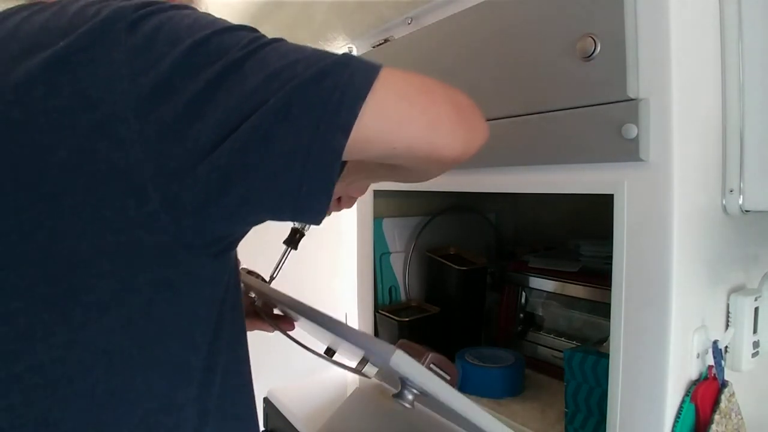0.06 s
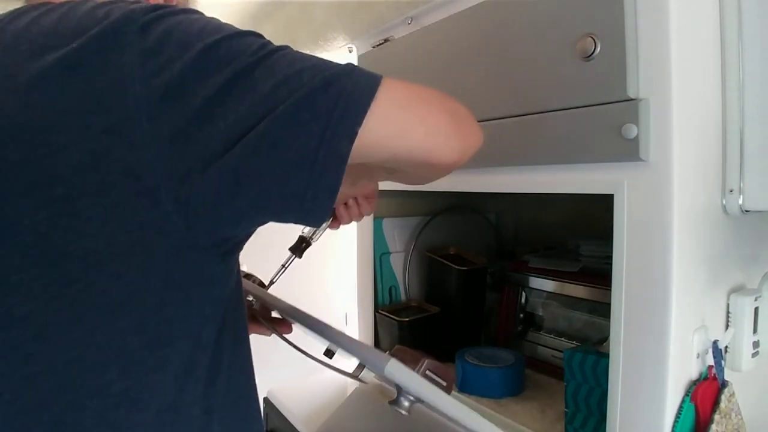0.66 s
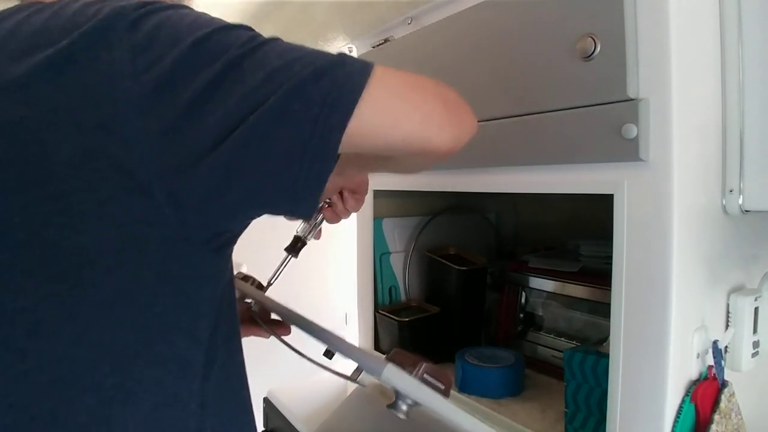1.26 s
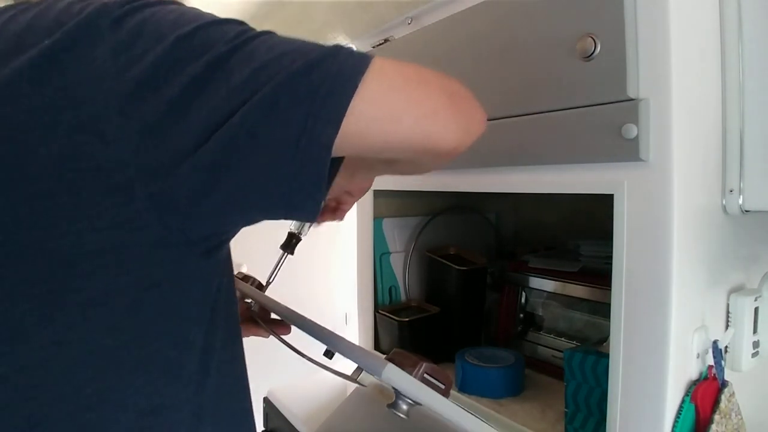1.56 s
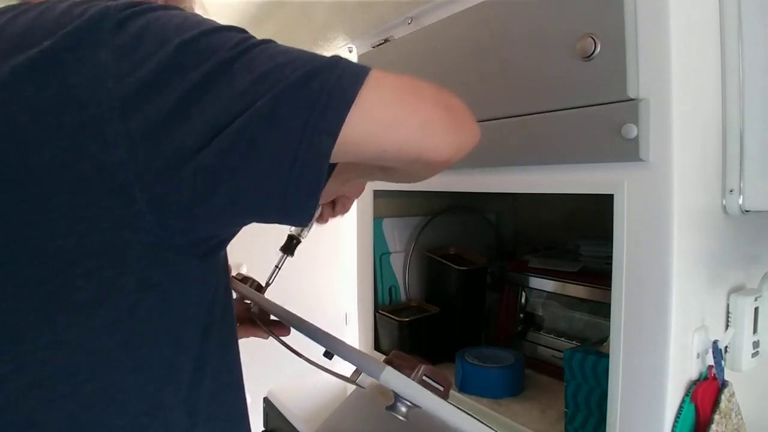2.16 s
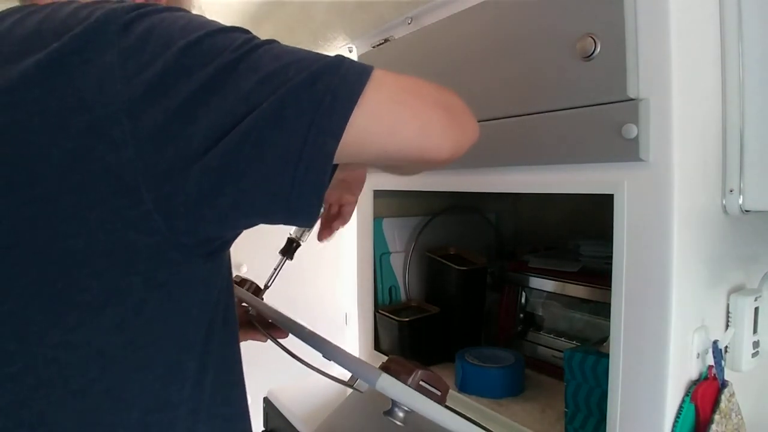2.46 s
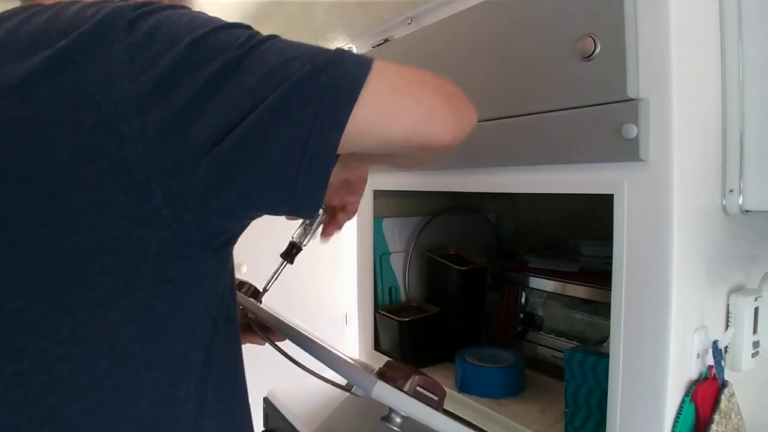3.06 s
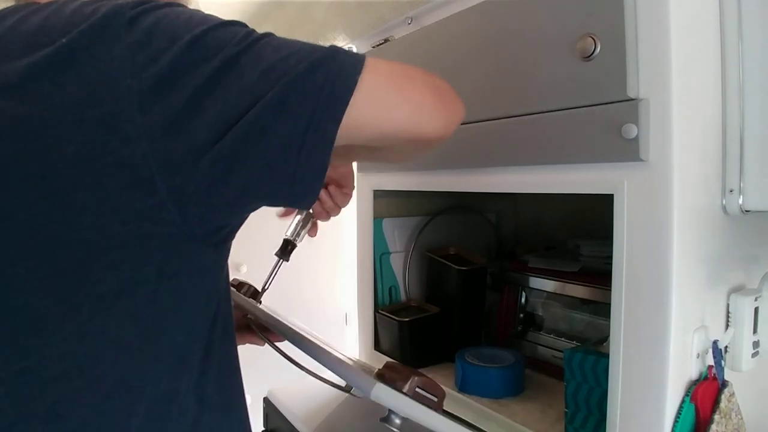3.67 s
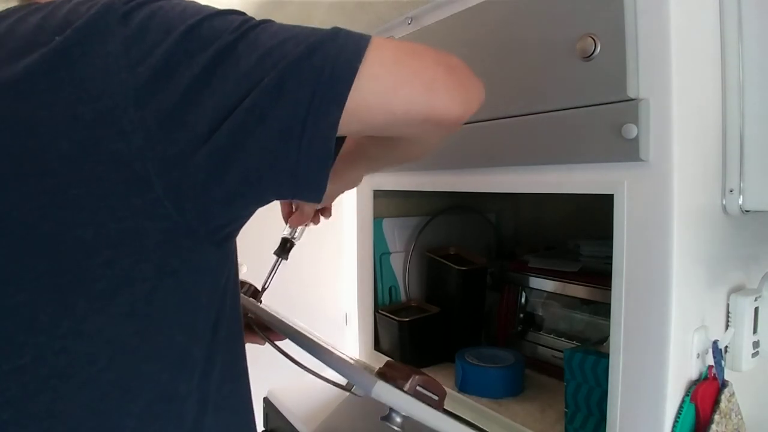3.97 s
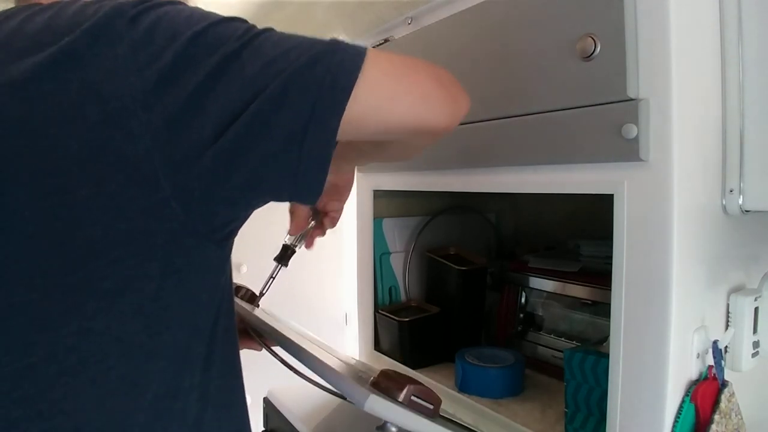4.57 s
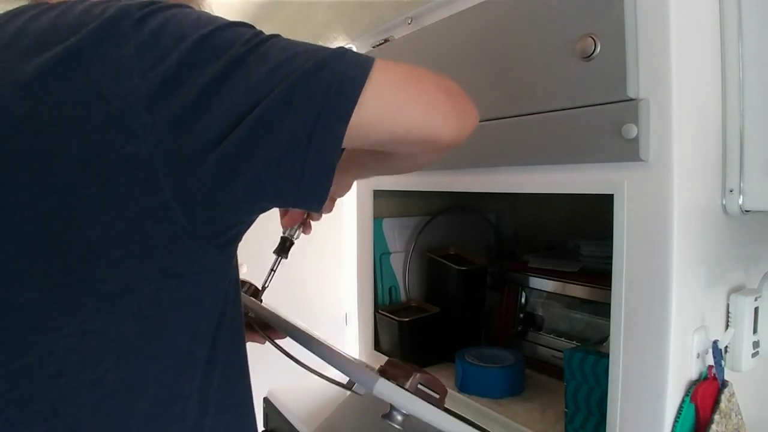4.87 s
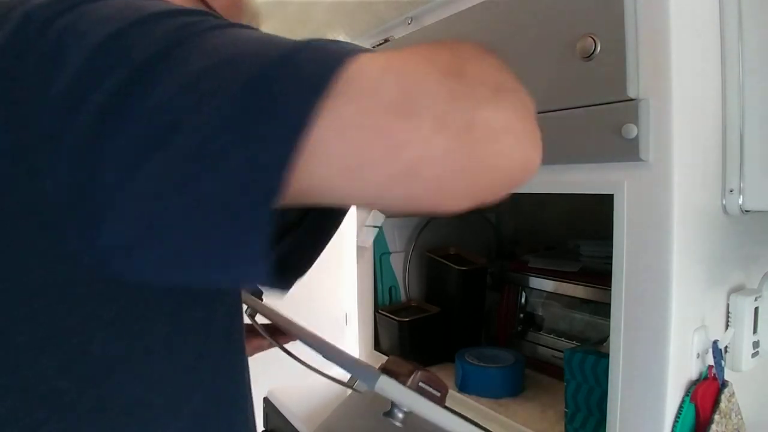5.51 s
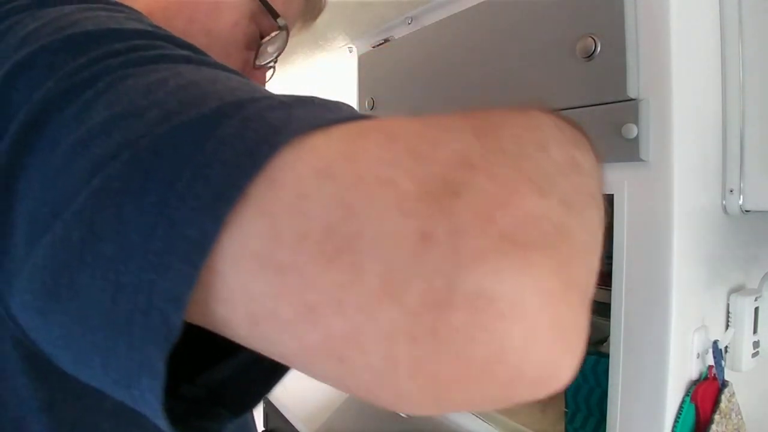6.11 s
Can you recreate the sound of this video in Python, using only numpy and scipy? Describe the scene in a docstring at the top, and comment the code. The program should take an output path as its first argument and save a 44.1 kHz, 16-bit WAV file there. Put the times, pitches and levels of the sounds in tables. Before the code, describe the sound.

Faint metal screwdriver clicks and uneven wooden cabinet door knocks in a small quiet room, then low thuds and one firm knock.

```python
"""A hand screwdriver drives a screw into a loose cabinet door in a travel trailer's small kitchen.
With each twist the steel bit ticks in the screw head and the door knocks on its fittings.
At the end the worker shifts weight, the floor thuds, a sleeve rustles and the tool is set down.
Each impact is a sum of decaying bands of modes and noise, heard over faint room air."""
import sys
import numpy as np
from scipy import signal
from scipy.fft import rfft, irfft, next_fast_len
from scipy.io import wavfile

SR = 44100
rng = np.random.default_rng(int(sys.argv[2]) if len(sys.argv) > 2 else 0)


def put_to_file(sound):
    """Save the sound as 16-bit audio at rate SR, in the file named by the first command-line argument."""
    columns = np.atleast_2d(sound).T  # one column per channel
    safe = np.clip(columns, -1, 1)
    whole_steps = np.round(safe * 32767)
    wavfile.write(sys.argv[1], SR, whole_steps.astype(np.int16))


N = 279940

# door and cabinet resonances: (frequency [Hz], level [dB])
DOOR_MODES = [(77, 3), (133, -5), (160, -19), (208, -9), (250, -9.5), (383, -1.5), (418, -3.5), (511, 1.5),
              (630, -4.5), (772, -1.5), (805, 2), (950, -12), (1125, -2), (1330, -22), (1572, -4.5),
              (1745, -12.5), (2050, -0.5), (2320, -2), (2445, 2), (2670, -2.5), (2785, -24.5), (2920, 4),
              (3730, 5.5), (4220, -4.5), (4610, -12), (4850, 1), (5110, 2)]
# bands for struck(); dense_db: dense modes against clear ones; direct: extra gain at the onset
THUMP = dict(low_hz=51.6, high_hz=167.5, swell_s=0.038, t60_s=0.17, dense_db=1.5, direct=0)
CRACK = dict(low_hz=1815, high_hz=6800, swell_s=1e-4, t60_s=0.099, dense_db=3.5, direct=0.83)


def screwdriver(click_db=-3, sparkle_db=-22.5, nominal_ring_hz=3060):
    """Steel slips on steel: a bright click, a short ring of shaft and bit, a little of the door."""
    # slips of the bit: (time [s], level [dB], door [dB], shaft ring [dB], bit chink [dB], ring [Hz])
    ticks = [(0.0, -41, -11.5, -8, -12, 3500), (0.305, -70.5, 3.5, -15, -6, 3060),
             (0.61, -50.5, -1, 0.5, -8, 3065), (0.624, -49, 2.5, -3, -8, 2840),
             (1.064, -68, 2.5, -11, -6, 3070), (1.126, -55.5, -3.5, -5, -15, 3060),
             (1.139, -52, -3, -0.5, -17, 3030), (1.566, -59.5, -5, 0, -9, 3064),
             (2.099, -46.5, -4, 4.5, -6, 3036), (2.445, -67, 6, -1, -14, 3060),
             (2.704, -56, 1.5, 5.5, -12, 3060), (2.772, -63, 0.5, -0.5, -18, 3400),
             (2.823, -66, -4, -4, -22, 3070), (3.045, -61.5, 1.5, -13, -9, 3060),
             (3.326, -48, -2, -12, -0.5, 3080), (3.657, -76.5, 7, 8.5, -13, 3220),
             (4.038, -70, 6.5, 3, -17, 3060), (4.059, -59.5, -1.5, -4.5, -7.5, 3070),
             (4.697, -59.5, 7, 1, -10, 3170), (4.704, -54.5, -3.5, 7.5, -14, 3110),
             (4.825, -54, -10, 0, -7, 3630), (5.174, -61, 3, 8.5, -21, 2950),
             (5.33, -62, -10, -11, -15, 3060)]
    # shaft and bit resonances: (frequency [Hz], level [dB])
    steel_modes = [(2930, -10), (3060, -2), (3230, -4.5), (8050, -19), (8450, -10), (8800, 23)]
    click = dict(low_hz=1450, high_hz=6600, swell_s=1e-4, t60_s=0.13, dense_db=0, direct=1)
    chink = dict(low_hz=7940, high_hz=8700, swell_s=1e-4, t60_s=0.1, dense_db=5.5, direct=3.7)
    sparkle = dict(low_hz=10900, high_hz=15500, swell_s=1e-4, t60_s=0.14, dense_db=0, direct=1.4)
    out = np.zeros((2, N))
    for s, db, door_db, ring_db, chink_db, ring_hz in ticks:
        rise_s = rise_time(db + 13.5)   # steel bites sooner than wood
        tuning = ring_hz / nominal_ring_hz   # a firmer seat stiffens the tool and raises its ring
        steel = np.array(steel_modes) * [tuning, 1]
        shaft = dict(low_hz=2590 * tuning, high_hz=3220 * tuning,
                     swell_s=0.00058, t60_s=0.098, dense_db=5, direct=0.98)
        tick = from_db(click_db) * struck(click, rise_s)
        tick += from_db(door_db) * wood(DOOR_MODES, rise_s, thump_db=-6, flex_db=-6, knock_db=-4)
        tick += from_db(ring_db) * struck(shaft, rise_s, steel)
        tick += from_db(chink_db) * lean_left(2.5) * struck(chink, rise_s, steel)
        tick += from_db(sparkle_db + 0.6 * ring_db) * struck(sparkle, rise_s)
        add(out, s, from_db(db) * tick)
    return out


def door(rebound_above_db=-36, rebound_s=0.04, rebound_db=-20.5):
    """The door knocks on its fittings and falls back once after a hard knock."""
    # blows: (time [s], level [dB], cabinet weight [dB], contact sharpness [dB], hardness [Hz])
    knocks = [(0.453, -61.5, 17, -2, 4700), (0.563, -69, -3, 2, 4800), (0.593, -73, 15.5, 7, 4000),
              (0.646, -59.5, -21, 10.5, 2500), (0.791, -48.5, -11, -22, 3200),
              (0.796, -46.5, -0.5, -4, 3240), (0.868, -63, 2.5, -12, 4100), (0.98, -54, -8.5, -5.5, 3020),
              (1.153, -42.5, 3, -1.5, 3060), (1.354, -64.5, 9, -4.5, 4830), (1.668, -44.5, -0.5, 7.5, 4040),
              (1.874, -63.5, 9, -7.5, 4200), (1.958, -73.5, 13, -14, 3700), (2.031, -64, 8, -22, 3200),
              (2.049, -64.5, 4, -2, 3180), (2.092, -61, -4, -11, 4000), (2.448, -49.5, -5.5, -3.5, 4500),
              (2.629, -61, 3.5, -25, 4600), (2.656, -56.5, -6, -20.5, 3300), (3.047, -50, -13, -7, 3830),
              (3.285, -60, -3, -7.5, 3400), (3.681, -55.5, 3, -19, 3400), (3.695, -30.5, -19, -8.5, 3600),
              (3.911, -66, -8, -18, 3900), (4.442, -56.5, -7.5, -8.5, 4020),
              (4.516, -32, -16.5, -6.5, 3970), (4.703, -37.5, -17, -5, 4640),
              (5.1966, -50.5, -4.5, -2.5, 3630), (5.236, -62.5, -3, 5, 4530)]
    out = np.zeros((2, N))
    for s, db, weight_db, sharp_db, hardness_hz in knocks:
        rise_s = rise_time(db + max(sharp_db, 0))   # a sharp contact bites sooner
        add(out, s, from_db(db) * door_blow(rise_s, hardness_hz, weight_db, sharp_db))
        if db > rebound_above_db:
            rebound = door_blow(rise_s, hardness_hz, weight_db=-5, sharp_db=-7.5)
            add(out, s + rebound_s, from_db(db + rebound_db) * rebound)
    return out


def door_blow(rise_s, hardness_hz, weight_db, sharp_db, body_db=-1, snap_db=-35.5):
    """The wood rings and the contact cracks; a sharper contact favours the high modes."""
    snap_band = dict(low_hz=4860, high_hz=8700, swell_s=1e-4, t60_s=0.12, dense_db=0, direct=0.43)
    body = wood(DOOR_MODES, rise_s, thump_db=weight_db - 1, flex_db=0.5 + 0.67 * weight_db,
                knock_db=0, tilt_db_oct=0.33 * sharp_db)
    crack = struck(CRACK, rise_s, DOOR_MODES, hardness_hz)
    snap = from_db(snap_db) * struck(snap_band, rise_s)
    return from_db(body_db) * body + from_db(sharp_db) * (crack + snap)


def tool_set_down(at_s=6.2935, rise_s=0.0019, crack_db=-32):
    """The handle lands on the counter with one firm knock."""
    # counter resonances: (frequency [Hz], level [dB])
    counter_modes = [(125, 0), (378, 0), (545, -6), (640, -12), (780, -7.5), (945, -3), (1040, -11),
                     (1315, 2.5), (1380, -3), (1565, -8.5), (1860, -9), (2046, -2), (2380, -1), (2700, 0),
                     (2880, 3), (3250, -18), (3700, -12), (4150, -19), (4950, 2)]
    body = wood(counter_modes, rise_s, thump_db=-48, flex_db=-36, knock_db=-25.5)
    crack = from_db(crack_db) * struck(CRACK, rise_s / 2, counter_modes, hardness_hz=4500)
    out = np.zeros((2, N))
    add(out, at_s, body + crack)
    return out


def wood(modes, rise_s, thump_db, flex_db, knock_db, tilt_db_oct=0):
    """A blow moves the cabinet, bends the panel and sets the board ringing."""
    panel = dict(low_hz=179, high_hz=510, swell_s=0.0056, t60_s=0.12, dense_db=-6.5, direct=0)
    board = dict(low_hz=452, high_hz=1606, swell_s=0.0015, t60_s=0.098, dense_db=-2, direct=0.15)
    thump = from_db(thump_db) * struck(THUMP, rise_s, modes)
    flex = from_db(flex_db) * struck(panel, rise_s, modes)
    knock = from_db(knock_db) * struck(board, rise_s, modes, tilt_db_oct=tilt_db_oct)
    return thump + (flex + knock) * lean_left(-0.22)


def struck(part, rise_s, modes=(), hardness_hz=None, tilt_db_oct=0):
    """Clear modes (sines) and dense modes (noise) die away in one band; energy of 30 ms at rms 1."""
    direct_s, diffuse_hz = 0.0015, 1250   # time before the walls answer; left and right differ above
    lead_s = np.array([[0.00017], [0]])   # left arrives first
    t = np.arange(8192) / SR
    hz = np.fft.rfftfreq(len(t), 1 / SR) + 1
    low, high = part["low_hz"], part["high_hz"]
    band = 1 / np.sqrt((1 + (low / hz) ** 16) * (1 + (hz / high) ** 28))
    octaves = np.log2(np.clip(hz, low, high) / low)
    drive = from_db(np.clip(tilt_db_oct, -12, 8) * octaves)
    if hardness_hz:   # a contact of finite length cannot excite the fastest modes
        drive /= np.sqrt((1 + (hz / hardness_hz) ** 12) * (1 + (hz / hardness_hz) ** 2))
    mid, side = rfft(rng.standard_normal((2, len(t))))
    likeness = 1 / (1 + (hz / diffuse_hz) ** 2)
    noise_spectrum = pair(mid, side, likeness) * np.exp(2j * np.pi * hz * lead_s)
    dense = irfft(noise_spectrum * band * drive)
    clear = np.zeros((2, len(t)))
    for mode_hz, db in modes:
        if low <= mode_hz < high:
            phase = rng.uniform(0, 2 * np.pi) + rng.normal(0, 0.62, (2, 1)) * mode_hz / diffuse_hz
            gain = from_db(db + rng.normal(0, 0.44)) * np.interp(mode_hz, hz, drive)
            clear += gain * np.sin(2 * np.pi * mode_hz * (t + lead_s) + phase)
    attack = 1 - np.exp(-t / (part["swell_s"] + rise_s))
    decay = from_db(-60 * t / part["t60_s"])
    onset = 1 + part["direct"] * np.exp(-t / direct_s)
    sound = rms_one(clear) + from_db(part["dense_db"]) * rms_one(dense)
    sound *= attack * decay * onset
    return sound / np.sqrt(np.sum(sound ** 2) / (2 * 0.03 * SR))


def rise_time(db, firm_db=-33.5, firm_rise_s=0.00069, doubling_db=12.5):
    """Rise time [s]: firm blows build up quickly, weak ones slowly."""
    return firm_rise_s * 2 ** ((firm_db - db) / doubling_db)


def worker(rumble_db=-3.5, rustle_db=-76, brisk_db=-65, rustle_follows=0.57):
    """Shifting weight shakes the trailer and thuds the floor; the shirt rustles along."""
    # strength of body movement: (time [s], level [dB])
    movement = [(0, -54.5), (.3, -69.5), (1.05, -62), (1.4, -78.5), (1.9, -63.5), (2.3, -71.5), (2.8, -66),
                (3.2, -76.5), (4.3, -83.5), (4.8, -68), (5.15, -79.5), (5.45, -61), (5.8, -60), (6.0, -73)]
    # trailer rumble: (frequency [Hz], relative density [dB])
    rumble = [(30, -19), (55, -13.5), (78, 6.5), (110, -11), (170, -5), (260, -10), (450, -29), (900, -49)]
    # shirt rustle: (frequency [Hz], relative density [dB])
    rustle = [(100, -8), (250, -7), (450, 4), (900, -4.5), (2000, -12), (4000, -17), (8500, -22.5),
              (10500, -29)]
    # the floor gives: (time [s], level [dB])
    thuds = [(5.406, -62), (5.467, -49), (5.658, -55), (5.784, -67)]
    movement_db = np.interp(np.arange(N) / SR, *np.transpose(movement))
    out = from_db(movement_db + rumble_db) * steady_noise(rumble)
    out += from_db(rustle_db + rustle_follows * (movement_db - brisk_db)) * steady_noise(rustle)
    for s, db in thuds:
        add(out, s, from_db(db) * struck(THUMP, rise_s=0.061, modes=DOOR_MODES, hardness_hz=108))
    return out


def room_air(level_db=-68.5):
    """Still air of the trailer, with faint hiss."""
    # noise floor: (frequency [Hz], relative density [dB])
    air = [(25, -14.5), (50, -4), (80, 3), (120, -3.5), (170, -3.5), (250, -10), (500, -16.5),
           (1300, -24.5), (2500, -28), (6000, -29.5), (8500, -26), (10000, -33.5), (15500, -31)]
    return from_db(level_db) * steady_noise(air)


def steady_noise(spectrum):
    """Stereo noise, alike in the bass and unrelated in the treble; mid rms 1."""
    # room sound field: (frequency [Hz], left-right likeness [0..1])
    air_likeness = [(30, 0.56), (80, 0.81), (200, 0.58), (500, 0.21), (1500, 0.083), (5000, 0.018),
                    (15000, .02)]
    size = next_fast_len(N)
    hz = np.fft.rfftfreq(size, 1 / SR) + 1
    gain = rms_one(from_db(at_hz(spectrum, hz)))
    likeness = at_hz(air_likeness, hz)
    mid, side = rfft(rng.standard_normal((2, size)))
    return irfft(pair(mid, side, likeness) / np.sqrt(1 + likeness) * gain, size)[:, :N]


def pair(mid, side, likeness):
    """Two noises to left and right of given correlation."""
    return np.sqrt(1 + likeness) * mid + np.sqrt(1 - likeness) * side * np.array([[1], [-1]])


def lean_left(db):
    """Stereo gains: left up, right down by db."""
    return from_db([[db], [-db]])


def from_db(db):
    """Decibels to gain."""
    return 10 ** (np.asarray(db) / 20)


def rms_one(x):
    """Scale to rms 1."""
    return x / np.sqrt(np.mean(x ** 2) + 1e-20)


def at_hz(points, hz):
    """Interpolate on a log-frequency axis."""
    points_hz, values = np.transpose(points)
    return np.interp(np.log(hz), np.log(points_hz), values)


def add(out, s, sound):
    """Mix a short sound in at time s."""
    at = round(s * SR)
    out[:, at:at + sound.shape[1]] += sound[:, :N - at]


def scene():
    """Door, tool and worker over the quiet of the trailer."""
    return door() + screwdriver() + tool_set_down() + worker() + room_air()


def record(dry):
    """Steep elliptic low-pass."""
    cutoff_hz = 15900
    return signal.sosfilt(signal.ellip(10, .1, 70, cutoff_hz, fs=SR, output="sos"), dry)


dry = scene()
out = record(dry)
put_to_file(out)
```